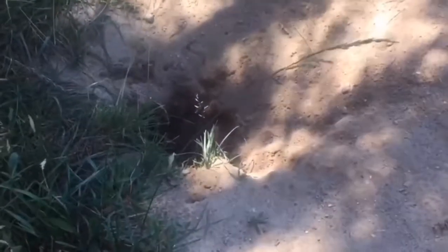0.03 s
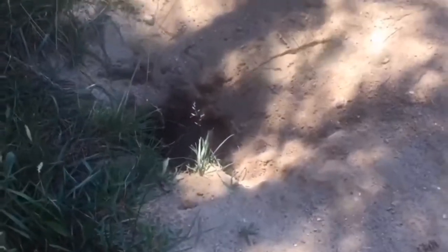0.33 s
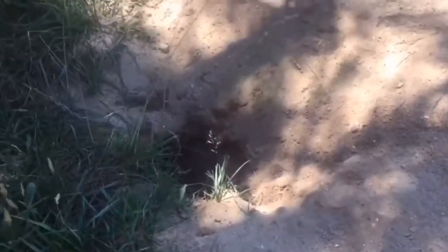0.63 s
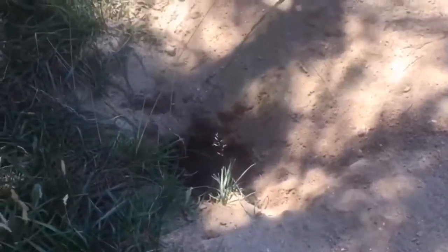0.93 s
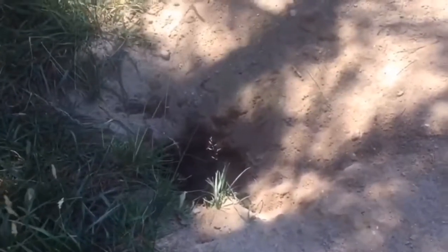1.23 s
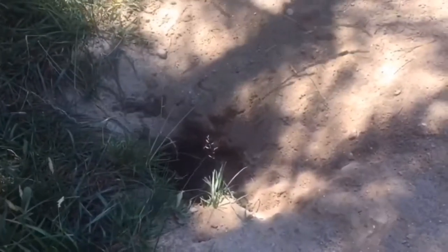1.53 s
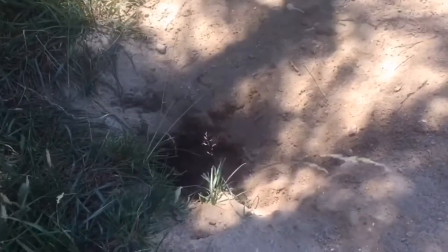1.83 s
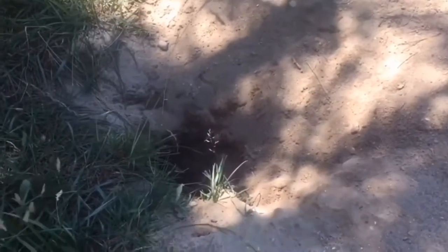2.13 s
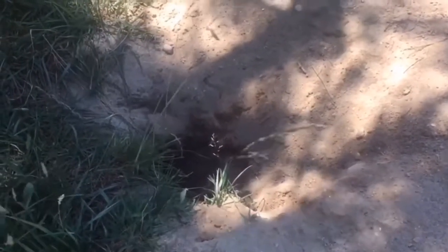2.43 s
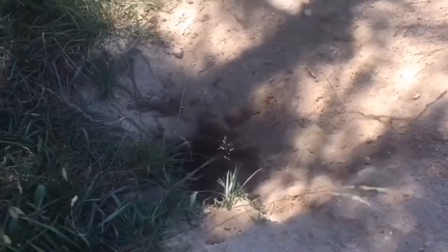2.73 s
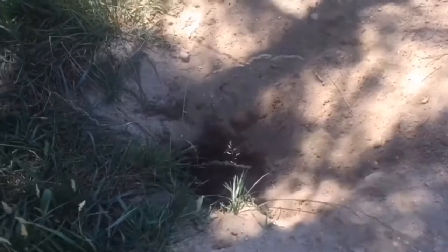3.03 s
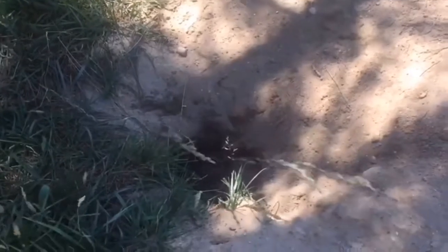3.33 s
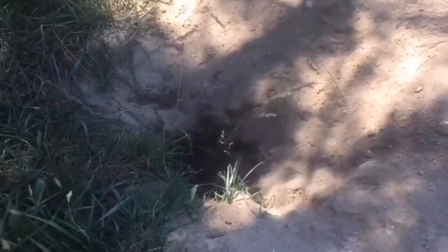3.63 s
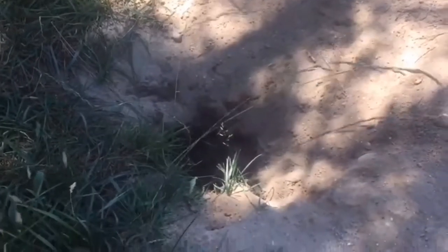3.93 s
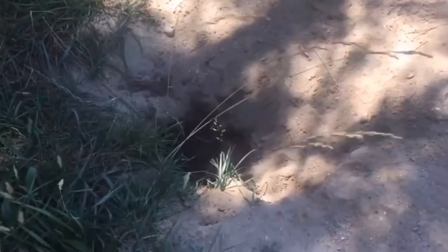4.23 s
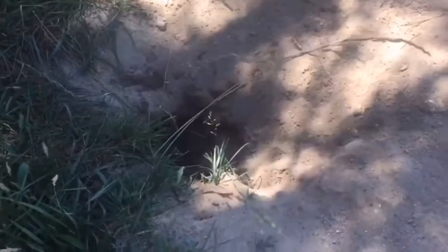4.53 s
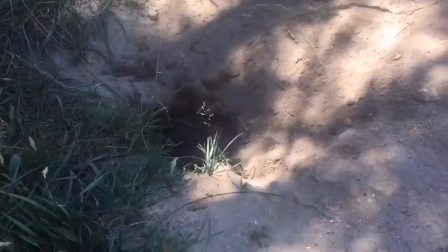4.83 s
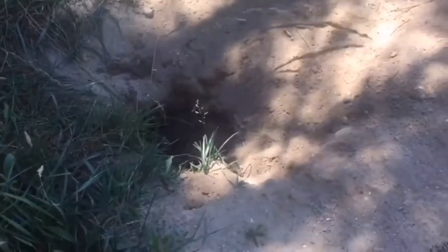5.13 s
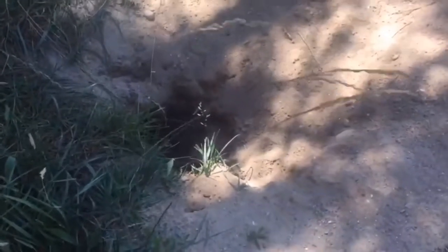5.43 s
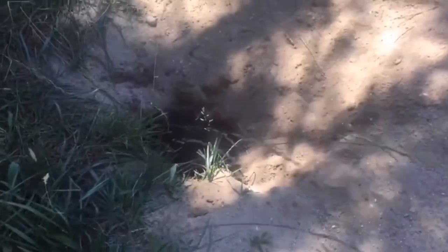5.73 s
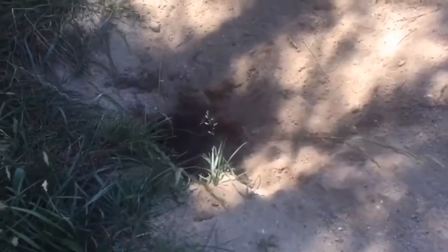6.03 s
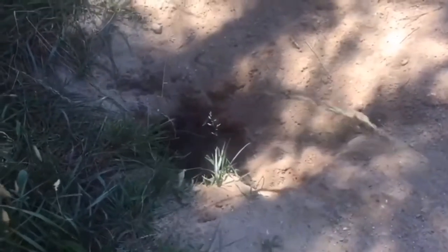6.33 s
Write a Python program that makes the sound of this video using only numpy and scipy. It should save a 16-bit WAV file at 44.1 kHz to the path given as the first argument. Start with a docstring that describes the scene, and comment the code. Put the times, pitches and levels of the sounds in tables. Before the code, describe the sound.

A breeze rumbles and flutters on a hand-held microphone outdoors, swelling in small gusts that land as dull bumps. Behind it, wind rushes steadily through treetops with a soft hiss of leaves, brightening briefly now and then as it catches a nearer branch. Dry grass rustles and ticks very faintly close by. Near the end, a distant roar of wind swells gently.

```python
"""Wind in trees and on a microphone.

A breeze rumbles on a hand-held camera's microphone; single eddies hit it as dull bumps.
Wind rushes through the crowns, hisses in the leaves and now and then catches a nearer bough.
Dry grass rustles and ticks faintly close by."""
import sys
import numpy as np
from scipy import signal
from scipy.fft import rfft, irfft, next_fast_len
from scipy.io import wavfile
from scipy.ndimage import uniform_filter1d, map_coordinates

SR = 44100
rng = np.random.default_rng(int(sys.argv[2]) if len(sys.argv) > 2 else 0)


def unload_audio(sound):
    """Save the sound as a 16-bit wav file, at the path given as the first command line argument."""
    columns = np.transpose(np.atleast_2d(sound))
    # keep every value between -1 and 1, then stretch to whole-number steps
    steps = np.round(np.clip(columns, -1, 1) * 32767)
    wavfile.write(sys.argv[1], SR, steps.astype(np.int16))


N = 289737
TIME_S = np.arange(N) / SR


# Gusts on the microphone: (peak time [s], rumble [dB], flutter [dB], rise [s], fall [s])
GUSTS = [(.01, -28.5, -34.5, .04, 0.02), (.29, -34, -47, 0.047, .018), (.46, -25, -32, 0.029, 0.017),
         (.59, -27.5, -35, 0.062, 0.025), (.70, -31.5, -38.5, 0.014, .052), (1.37, -35, -46, 0.2, 0.076),
         (2.30, -31, -38, 0.12, 0.029), (2.59, -30.5, -34, 0.067, 0.015), (2.94, -30.5, -48, .039, 0.044),
         (3.19, -30, -33.5, .12, 0.019), (3.5, -37, -38.5, 0.021, 0.069), (3.85, -34.5, -39, 0.14, 0.069),
         (4.21, -32.5, -47, 0.035, 0.044), (4.83, -31, -38, 0.14, 0.098), (5.35, -32.5, -48.5, 0.19, 0.11),
         (5.9, -36, -46.5, .2, 0.12), (6.36, -31, -41, 0.058, 0.16)]

def gusts():
    """Rumble and flutter gains: each gust is a lopsided bell, and their powers add."""
    power = 0
    for peak_s, rumble_db, flutter_db, rise_s, fall_s in GUSTS:
        width_s = np.where(TIME_S < peak_s, rise_s, fall_s)
        power += amp([[rumble_db], [flutter_db]]) ** 2 * bell(TIME_S - peak_s, width_s) ** 2
    return np.sqrt(power)


# Draught between gusts: (time [s], rumble [dB], flutter [dB])
DRAUGHT = [(0, -35, -44), (.65, -38.5, -49), (.8, -40.5, -46.5), (1.0, -36, -41), (1.22, -44, -41.5),
           (1.6, -35.5, -38.5), (1.85, -41.5, -35.5), (2.02, -45, -35.5), (2.18, -39, -42),
           (2.4, -41, -40.5), (2.62, -38, -41.5), (2.7, -35, -33), (2.8, -43.5, -36.5), (3.1, -37, -40.5),
           (3.27, -40.5, -48), (3.43, -40.5, -43), (3.65, -35, -37.5), (3.9, -38, -44.5), (4.0, -40.5, -46),
           (4.14, -36.5, -42), (4.3, -42, -37), (4.52, -39, -35), (4.9, -42, -39.5), (5.02, -53, -39),
           (5.2, -35.5, -36), (5.55, -34, -38.5), (6.0, -39, -35), (6.2, -35, -36.5), (6.57, -41, -35.5)]
# Spectra of slow and quick eddies: (frequency [Hz], density [dB])
RUMBLE = [(15, -51), (25, -30), (40, -12.5), (60, 1), (85, -2.5), (120, -3), (170, -15), (260, -28.5),
          (600, -61), (2000, -140)]
FLUTTER = [(60, -21), (120, 1), (170, 2.5), (250, -2.5), (320, -9), (440, -20.5), (800, -53), (3000, -140)]

def breeze():
    """Turbulence on the microphone: slow eddies rumble, quick ones flutter, both swell in gusts."""
    rumble_gust, flutter_gust = gusts()
    rumble_db, flutter_db = curves(DRAUGHT)
    rumble = steady(coloured(rng.standard_normal(N), RUMBLE), size=2800)
    flutter = coloured(rng.standard_normal(N), FLUTTER)
    flutter = steady(flutter + 0.25 * vortices(), size=2600)
    rumble *= np.hypot(amp(rumble_db), rumble_gust)
    flutter *= np.hypot(amp(flutter_db), flutter_gust)
    swing_db = 1.7 * wobble(rate_hz=30)
    return amp(swing_db) * (rumble + flutter)


def vortices():
    """Vortices shed from the camera's edge at a loosely wandering pitch."""
    shed_hz = 203.8 * np.exp(0.13 * wobble(rate_hz=4.2) + 0.12 * wobble(rate_hz=70))
    return wobble(rate_hz=45) * np.sin(2 * np.pi * np.cumsum(shed_hz) / SR)


# Single eddies: (time [s], relative level [dB], pitch [Hz])
EDDIES = [(0.242, -14, 102), (0.272, -16.5, 196), (0.287, -13, 92), (0.299, -18, 100), (.454, -18, 290),
          (0.465, -11.5, 149), (0.474, -19, 260), (0.541, -18.5, 209), (0.566, -16.5, 434),
          (.569, -13, 240), (0.578, -13.5, 170), (0.586, -18.5, 346), (0.597, -17, 225), (.604, -29, 340),
          (0.621, -17.5, 218), (0.685, -18, 80), (0.712, -21.5, 88), (.842, -23, 75), (1.008, -26, 104),
          (1.094, -27, 135), (1.147, -25, 149), (1.327, -19.5, 131), (1.397, -21.5, 125),
          (1.462, -26.5, 115), (1.688, -19.5, 63.6), (2.22, -22, 80), (2.271, -20, 78), (2.290, -11.5, 160),
          (2.298, -24, 400), (2.308, -18, 84), (2.535, -15.5, 265), (2.558, -22.5, 105),
          (2.586, -14.5, 146), (2.931, -18, 86), (2.958, -25, 100), (3.131, -17, 176), (3.153, -15, 142),
          (3.171, -19, 99), (3.2, -14.5, 89.5), (3.775, -22, 105), (3.854, -15, 86), (4.07, -22.5, 78),
          (4.122, -23.5, 90), (4.194, -25, 337), (4.208, -13.5, 145), (4.342, -31, 300), (4.362, -20.5, 84),
          (4.894, -15.5, 106), (4.94, -21, 258), (5.282, -20, 80), (5.323, -17.5, 87), (5.359, -14, 104),
          (5.437, -17.5, 125), (5.9, -23, 103), (6.36, -15.5, 129)]

def eddy_bumps():
    """Each eddy's core sucks at the microphone: a pressure dip between two crests, plus a puff."""
    build_cycles, fade_cycles = 0.48, 0.58
    out = np.zeros(N)
    puff = steady(band(centre_hz=286, octaves=0.58), size=600)
    for time_s, level_db, pitch_hz in EDDIES:
        near = np.abs(TIME_S - time_s) < 0.05
        cycles = (TIME_S[near] - time_s) * pitch_hz
        envelope = bell(cycles, np.where(cycles < 0, build_cycles, fade_cycles))
        raggedness = 0.18 * pitch_hz / 300  # quick eddies are more ragged
        pressure = raggedness * puff[near] - np.cos(2 * np.pi * cycles)
        out[near] += amp(level_db - 4) * envelope * pressure
    return out


# Wind strength in the trees, and the far roar: (time [s], level [dB])
WIND = [(0, -59), (.27, -61), (.46, -63), (.66, -60.5), (1.04, -61.5), (2.0, -61.5), (2.96, -61),
        (3.32, -63.5), (4.04, -59), (4.35, -60.5), (4.8, -60.5), (5.04, -62.5), (5.2, -59.5), (5.5, -61),
        (6.57, -58.5)]
ROAR = [(0, -57), (5.7, -48.5), (6.25, -42), (6.57, -45.5)]
# Spectra of crowns and leaves: (frequency [Hz], density [dB])
RUSH = [(40, -43), (150, -5), (420, -6), (600, -6), (780, -3), (930, 0), (1200, -1), (1650, -2), (2000, -6),
        (2250, -10.5), (2700, -15), (3200, -26), (4000, -47), (12000, -120)]
LEAVES = [(700, -48), (1500, -27), (2800, 2.5), (3650, 2.5), (4300, -3), (4950, -10), (5700, -11.5),
          (6800, -16.5), (7700, -25.5), (8800, -25.5), (9800, -35), (10500, -42), (16000, -56)]

def trees():
    """One wind drives the crowns' rush and the leaves' hiss; a lower, farther roar swells late."""
    wind_db, = curves(WIND)
    roar_db, = curves(ROAR)
    rush_db = -39 + 0.17 * (wind_db - wind_db.mean())
    rush = amp(rush_db) * coloured(patchy(depth_db=1.95), RUSH)
    leaves_db = wind_db + 1.73 + 0.3 * wobble(rate_hz=18)
    leaves = amp(leaves_db) * coloured(patchy(depth_db=2.5), LEAVES)
    roar = amp(roar_db) * band(centre_hz=645, octaves=0.47)
    return rush + leaves + roar


# Bough swells: (time [s], level [dB], width [s])
SWELLS = [(.17, -47.5, 0.11), (0.733, -43.5, 0.066), (1.47, -48, 0.051), (2.143, -45, 0.1),
          (5.26, -45.5, 0.033)]
# Bough spectrum: (frequency [Hz], density [dB])
BOUGH = [(700, -39), (1200, -8), (1650, 5.5), (2100, -6), (2800, -10), (4000, -27.5), (7000, -57)]

def boughs():
    """A nearer bough catches the wind and the rush brightens briefly."""
    swell = sum(amp(db) * bell(TIME_S - time_s, width_s) for time_s, db, width_s in SWELLS)
    return swell * coloured(rng.standard_normal(N), BOUGH)


# Stalk ticks: (time [s], level [dB], pitch [Hz], width [s], bandwidth [octaves])
TICKS = [(0.24, -34, 700, 0.0051, 0.6), (0.362, -40, 800, 0.0087, .4), (0.717, -71, 9100, 0.0045, .16),
         (.850, -76, 7000, .018, .16), (1.307, -38, 720, 0.0063, 0.091), (1.42, -37.5, 760, 0.008, 0.15),
         (3.001, -40, 730, 0.0068, 0.12)]
# Blade rustle: (time [s], level [dB])
RUSTLE = [(0, -79), (.6, -90), (1.3, -85), (2.6, -80.5), (3.3, -82), (3.7, -80), (4.4, -81), (4.95, -87),
          (5.35, -85), (6.57, -86)]
# Blade spectrum: (frequency [Hz], density [dB])
BLADES = [(3000, -27.5), (7000, -2), (8800, 0.5), (9700, -3.5), (10400, -8), (11500, -3.5), (13000, -5),
          (16000, -8.5)]

def grass():
    """Dry stalks tick over the fine, flickering rustle of their blades."""
    ticks = np.zeros(N)
    for time_s, level_db, pitch_hz, width_s, octaves in TICKS:
        noise = steady(band(pitch_hz, octaves), size=500)
        ticks += amp(level_db) * bell(TIME_S - time_s, width_s) * noise
    rustle_db, = curves(RUSTLE)
    flicker_db = 1.8 * wobble(rate_hz=22)
    return ticks + amp(rustle_db + flicker_db) * coloured(patchy(depth_db=5.5), BLADES)


def amp(db):
    """Decibels to gain."""
    return 10 ** (np.asarray(db) / 20)


def unit(x):
    """Scale to rms 1."""
    return x / np.sqrt(np.mean(x ** 2) + 1e-20)


def bell(offset, width):
    """Gaussian of peak 1."""
    return np.exp(-0.5 * (offset / width) ** 2)


def curves(rows):
    """One value per sample for each column after the time."""
    times_s, *columns = np.transpose(rows)
    return [np.interp(TIME_S, times_s, column) for column in columns]


def wobble(rate_hz):
    """Smooth curve through random knots."""
    knots = rng.standard_normal(int(N * rate_hz / SR) + 4)
    return map_coordinates(knots, [TIME_S * rate_hz])


def filtered(x, response):
    """Apply a gain given as a function of frequency."""
    size = next_fast_len(N + SR // 2)
    return irfft(rfft(x, size) * response(np.fft.rfftfreq(size, 1 / SR)), size)[:N]


def coloured(x, spectrum):
    """Shape x by (frequency [Hz], gain [dB]) points on a log axis; rms 1."""
    knots_hz, db = np.transpose(spectrum)
    return unit(filtered(x, lambda hz: amp(np.interp(np.log(hz + 1), np.log(knots_hz + 1), db))))


def band(centre_hz, octaves):
    """Noise in a bell-shaped band; rms 1."""
    noise = rng.standard_normal(N)
    return unit(filtered(noise, lambda hz: bell(np.log2((hz + 1) / centre_hz), octaves)))


def patchy(depth_db):
    """White noise whose gain drifts in patches of time and frequency."""
    bins = signal.stft(rng.standard_normal(N), nperseg=1024)[2]
    patches = uniform_filter1d(rng.standard_normal(bins.shape), size=3, axis=0)
    patches = uniform_filter1d(patches, size=9, axis=1)
    return signal.istft(bins * amp(depth_db * unit(patches)), nperseg=1024)[1][:N]


def steady(x, size):
    """Divide by the running rms over size samples: slow swells go, quick lumps stay."""
    return x / np.sqrt(np.abs(uniform_filter1d(x ** 2, size=size)) + 1e-6)


def scene():
    """Wind on the microphone, trees and grass; mono."""
    return (breeze() + eddy_bumps() + trees() + boughs() + grass())[None]


# Camera hiss spectrum: (frequency [Hz], density [dB])
HISS = [(100, 2.5), (9600, 2), (10400, -3), (11200, 0), (15500, -4)]

def record(dry):
    """A brief fade in and out avoids clicks; faint hiss is added and the top treble is cut."""
    cutoff_hz = 15720
    hiss = amp(-74.5) * coloured(rng.standard_normal(N), HISS)
    fade = signal.windows.tukey(N, 0.001)
    return filtered(fade * dry[0] + hiss, lambda hz: hz < cutoff_hz)[None]


dry = scene()
out = record(dry)
unload_audio(out)
```